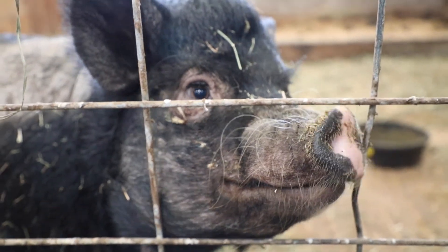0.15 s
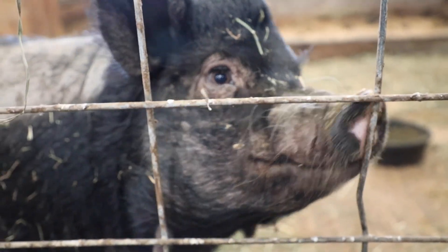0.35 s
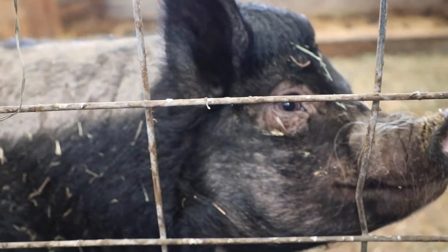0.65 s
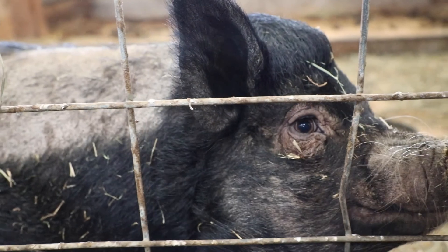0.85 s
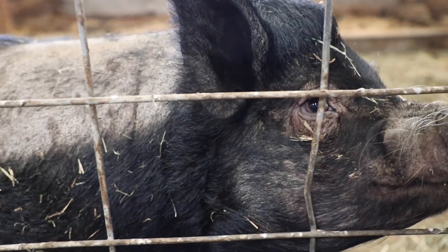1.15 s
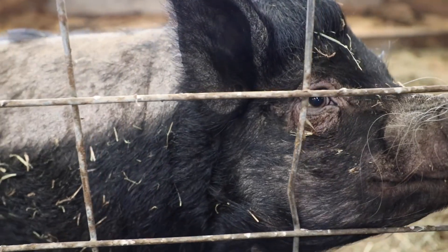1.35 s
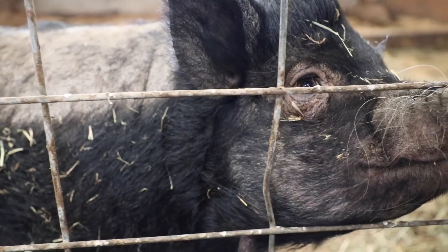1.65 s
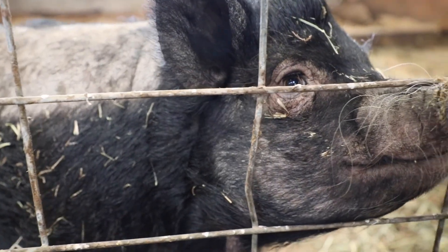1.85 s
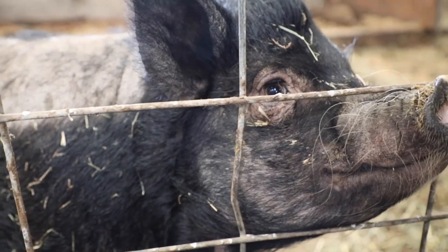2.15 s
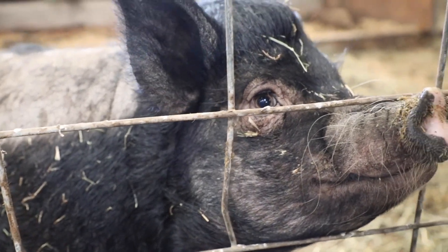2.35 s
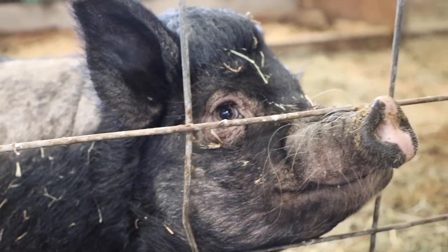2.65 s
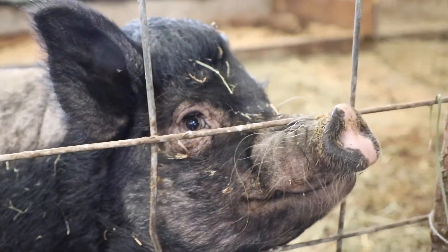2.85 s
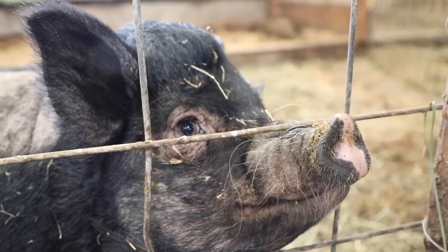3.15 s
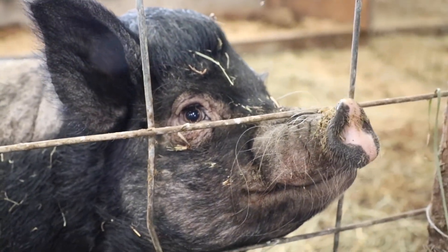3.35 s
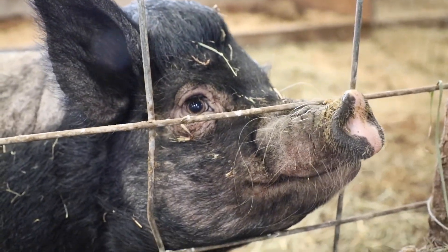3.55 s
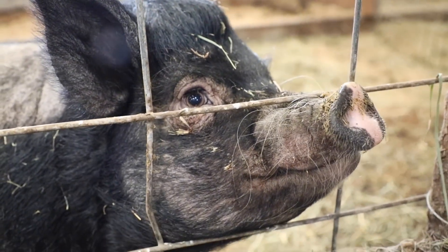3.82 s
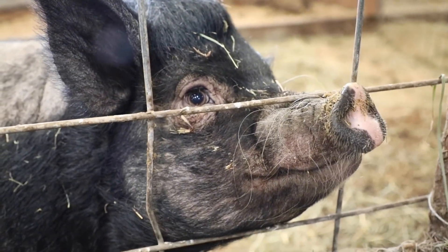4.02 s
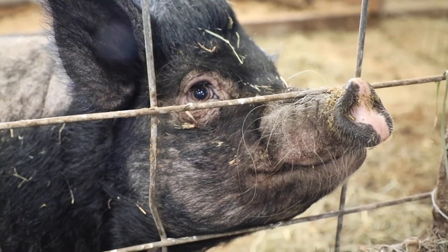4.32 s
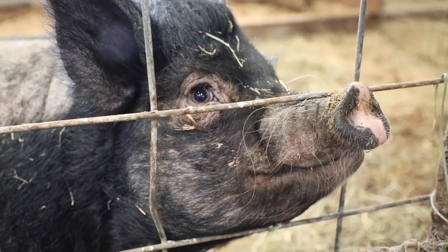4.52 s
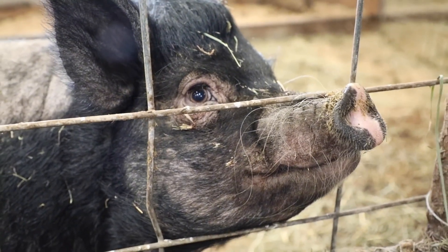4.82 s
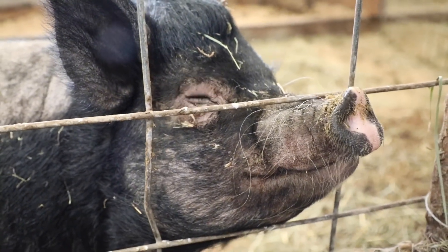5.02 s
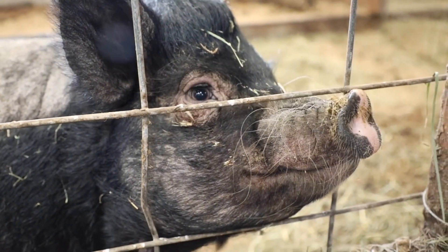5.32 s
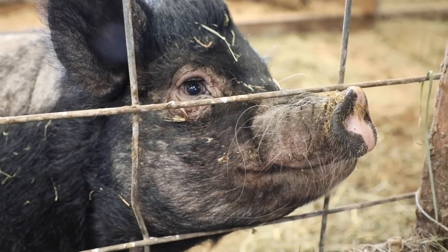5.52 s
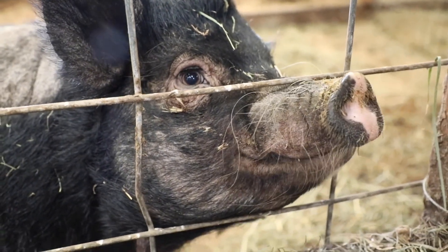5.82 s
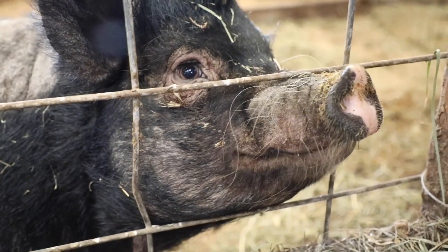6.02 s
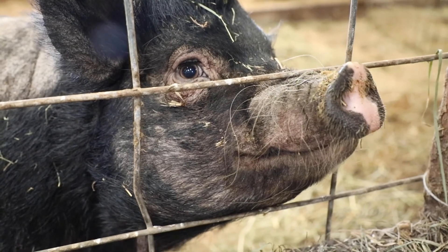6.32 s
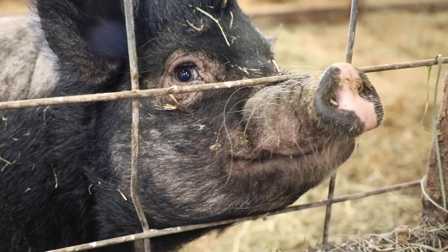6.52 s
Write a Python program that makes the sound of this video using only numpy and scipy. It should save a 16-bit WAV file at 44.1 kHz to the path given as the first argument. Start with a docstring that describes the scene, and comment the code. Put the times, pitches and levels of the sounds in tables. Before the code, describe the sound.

Close wet pig snorts, nasal breath and low air buffets, with hoarse distant crowing and one long rooster note echoing through a quiet barn.

```python
"""A pig snorts close to the microphone from the start: soft palate and nostrils flap, often about thirty times
a second, each flap a pulse into resonant cavities. Shaped noise hisses as breath, puffs and buffets on the
microphone, and wet ticks come early and late. Hoarse crowing, blurred partials and noise, sounds further off in
the barn before, under and after a rooster's long clear note of summed partials, from just after 3 s to past 5 s.
Throughout, the barn rings on through a decaying noise echo over its own quiet air."""
import sys
import numpy as np
from scipy import signal
from scipy.fft import rfft, irfft, next_fast_len
from scipy.io import wavfile
from scipy.ndimage import map_coordinates

SR = 44100
rng = np.random.default_rng(int(sys.argv[2]) if len(sys.argv) > 2 else 0)


def digitize_waveform(pressure):
    """Quantize a signal to 16-bit integers and store it at the path in sys.argv[1].

    Rows of a 2-D input are taken as channels; values are limited to [-1, 1].
    """
    field = np.atleast_2d(pressure).T
    bounded = np.clip(field, -1, 1)
    quanta = np.round(bounded * 32767).astype(np.int16)
    wavfile.write(sys.argv[1], SR, quanta)


N = 294147
TIME = np.arange(N) / SR


def amp(db):
    """Gain of a level in dB."""
    return 10 ** (np.asarray(db) / 20)


def unit(x):
    """Scaled to rms 1."""
    return x / np.sqrt(np.mean(np.abs(x) ** 2) + 1e-20)


def along(points, hz):
    """(f/Hz, value) points read on a log frequency axis."""
    f, v = np.transpose(points)
    return np.interp(np.log(hz + 1), np.log(f + 1), v)


def curves(rows):
    """One value per sample for each column after the time."""
    s, *cols = np.transpose(rows)
    return [np.interp(TIME, s, c) for c in cols]


def during(rows, fade=0.031):
    """1 while a table lasts, fading out over about 31 ms beyond its ends."""
    return np.clip(1 + np.minimum(TIME - rows[0][0], rows[-1][0] - TIME) / fade, 0, 1)


def wobble(rate):
    """A smooth random curve of rms 1, rate knots a second."""
    knots = rng.standard_normal(int(N * rate / SR) + 4)
    return unit(map_coordinates(knots, [TIME * rate]))


def filtered(x, response):
    """x passed through a complex response of frequency."""
    m = next_fast_len(N + SR)
    return irfft(rfft(x, m) * response(np.fft.rfftfreq(m, 1 / SR)), m)[:N]


def resonances(modes):
    """Causal response of (f/Hz, width/Hz, level/dB) modes, alternating in sign."""
    def response(f):
        total = 0
        for k, (centre, width, db) in enumerate(modes):
            loss = 1j * f * width
            total = total + (-1) ** k * amp(db) * loss / (centre * centre - f * f + loss)
        return total
    return response


def noise(spectrum):
    """Noise of rms 1 with a given spectrum."""
    return unit(filtered(rng.standard_normal(N), lambda hz: amp(along(spectrum, hz))))


def resonant_noise(modes, power=1):
    """Noise through resonances, applied power times over."""
    return filtered(rng.standard_normal(N), lambda hz: resonances(modes)(hz) ** power)


def swells(rows, rise):
    """Power of each (t/s, hold/s, level/dB, fade/(dB/s)) event: a quick rise, a hold, a steady fade."""
    s, hold, db, fade = np.transpose(rows)[:4, :, None]
    rising = rise * np.maximum(s - TIME, 0)
    fading = fade * np.maximum(TIME - s - hold, 0)
    return amp(db - rising - fading) ** 2


# colour of the barn's quiet air: f/Hz, relative level/dB per Hz
BARN_AIR_COLOUR = [(20, 7.5), (200, -11.5), (600, -1.5), (1500, -12.5), (5000, -39), (16000, -52)]


def barn_air():
    """Steady coloured noise fills the barn quietly."""
    return amp(-59) * noise(BARN_AIR_COLOUR)


# how long the barn rings: f/Hz, time to fall 60 dB t60/s
BARN_DECAY = [(200, 0.84), (1000, 0.84), (4000, 0.69), (12000, 0.5)]


def barn(x):
    """Each frequency of the barn's answer dies at its own speed."""
    hz, t, z = signal.stft(rng.standard_normal(SR), SR, nperseg=256)
    decay = amp(-60 * t / along(BARN_DECAY, hz)[:, None])
    tail = signal.istft(z * decay, SR, nperseg=256)[1]
    delayed = np.pad(x, (500, 0))  # samples
    return signal.fftconvolve(delayed, tail / np.linalg.norm(tail))[:N]


# bursts of rasp: full at t/s, hold/s, relative level/dB, fade/(dB/s)
RASP_BURSTS = [(0.83, 0.027, -41.5, 150), (1.36, 0.032, -38, 93), (2.25, 0.019, -32, 166),
               (2.33, 0.035, -47, 14), (2.93, 0.26, -30, 246), (3.3, 0.024, -39, 60),
               (3.4, 0.031, -36.5, 61), (3.72, 0.047, -38.5, 107), (4.61, 0.011, -48.5, 131),
               (5.15, 0.39, -28.5, 70), (5.7, 0.063, -40, 27)]
RASP_RISE = 400  # dB/s
# hoarse notes: start t/s, length/s, first f/Hz, last f/Hz, relative level/dB,
# even partials over odd level/dB, third partial boost level/dB
HOARSE_NOTES = [(2.3, 0.074, 543, 550, -42, -13.5, 5), (2.44, 0.072, 491, 492, -35.5, -10, -29),
                (2.922, 0.11, 636, 629.7, -24.5, -3, 7.5), (2.992, 0.23, 532.5, 522, -39.5, 17.5, 15.5),
                (3.158, 0.12, 606, 755, -26, -1.5, 10.5), (3.338, 0.21, 740, 666, -34.5, -9.5, 8.5),
                (3.642, 0.24, 751, 746.6, -29.5, 2.5, 6), (3.704, 0.14, 650.4, 667, -33.5, -4.5, 9.5),
                (3.709, 0.098, 525.6, 519, -40, 4.5, -8), (5.127, 0.33, 533.7, 524, -32, 1, 3.5),
                (5.112, 0.14, 717, 540, -32.5, -12, -18), (5.236, 0.26, 664, 511.2, -29.5, -16, -4),
                (5.16, 0.46, 737, 764.5, -35.5, 9, 3), (5.138, 0.78, 820, 804, -34, -11.5, 14),
                (5.385, 0.43, 806.6, 749, -32, -14, -21), (5.444, 0.37, 403, 398.3, -28, -7, -5)]
# colour of the gullet: f/Hz, gain level/dB
GULLET_COLOUR = [(180, -60), (300, -17), (420, -12.5), (630, 5), (860, -4), (1050, -3.5), (1500, -2.5),
                 (1800, -18.5), (2500, -15.5), (3400, -24), (4200, -40.5), (5400, -18), (6500, -44),
                 (8000, -32), (12000, -60), (16000, -90)]


def hoarse():
    """Gliding notes of blurred partials and an unevenly throbbing noise rasp, both through the gullet."""
    throb = amp(9.5 + 2.2 * wobble(45))
    out = np.sqrt(swells(RASP_BURSTS, RASP_RISE).sum(0)) * throb * rng.standard_normal(N)
    for s, length, first_hz, last_hz, db, even_db, third_db in HOARSE_NOTES:
        t = np.arange(round(length * SR)) / SR
        turns = first_hz * t + (last_hz - first_hz) * t * t / (2 * length)
        arch = np.sqrt(np.abs(np.sin(np.pi * t / length)))
        for k in range(1, 9):
            # higher partials blur faster
            knots = rng.standard_normal((2, 200))
            blur = [map_coordinates(row, [np.minimum(t * (70 + 22 * k), 199)]) for row in knots]
            blurred = 0.58 + 0.78 * (blur[0] + 1j * blur[1])
            tone = np.real(np.exp(2j * np.pi * k * turns) * blurred)
            lift_db = even_db * (k % 2 == 0) + third_db * (k == 3) - 1.19 * k
            out[round(s * SR):][:len(t)] += amp(db + lift_db + 3 - 23.5 * t) * arch * tone
    return filtered(out, lambda hz: amp(along(GULLET_COLOUR, hz)))


def partial(turns, rough, blur_hz):
    """A partial near rms 1; the rough share of it is a narrow band of noise on the same pitch."""
    share = np.clip(rough, 0, 1)
    blur = wobble(blur_hz) + 1j * wobble(blur_hz)
    return np.real(np.exp(2j * np.pi * turns) * (np.sqrt(2 - 2 * share) + np.sqrt(share) * blur))


# the long crow's two parts, either side of a break in the voice: t/s, pitch f/Hz,
# first partial level/dB, second level/dB, seventh level/dB, roughness 0-1
CROW_PARTS = [
    [(3.2, 795, -28.5, -40, -56, .2), (3.26, 822, -23.5, -26, -59, 0.22),
     (3.35, 811, -31, -29.5, -62, 0.56), (3.44, 815, -26.5, -29.5, -62, 0.56),
     (3.51, 829, -29, -27, -50, 0.54), (3.62, 795.7, -26, -28, -63, .42),
     (3.72, 796.6, -35, -44, -64.5, 0.52)],
    [(3.77, 794.4, -28.5, -30, -59.5, 0.27), (3.84, 794.4, -25.5, -27.5, -55.5, 0.29),
     (3.9, 763.5, -24.5, -29.5, -57, 0.02), (4, 763.7, -24, -27, -56, 0.01),
     (4.31, 758.7, -27, -28.5, -59, 0.04), (4.45, 752.3, -31, -35.5, -60, 0.08),
     (4.62, 738.2, -35.5, -21.5, -62, 0.09), (4.79, 734, -33.5, -35.5, -61.5, 0.12),
     (4.91, 729.3, -44.5, -30, -57, 0.14), (5.02, 724.4, -31, -30.5, -54.5, 0.22),
     (5.11, 708.7, -27.5, -29.5, -55, 0.32), (5.16, 702, -65, -30, -57, .5),
     (5.26, 701, -57, -45, -79, 0.5)],
]
# upper series: partial number, level/dB over the seventh curve in the first part, in the second
UPPER_PARTIALS = [(3, 4.5, 4.5), (4, 14, 0), (5, -9, -4.5), (6, -27, -6.5), (7, 5, 2.5), (8, -9.5, -4),
                  (9, -8.5, -12), (10, -14, -16)]
# highest series: partial number, level/dB over the seventh curve
THIN_PARTIALS = [(11, -12), (12, -14), (13, -26), (14, -22), (15, -23), (16, -26), (17, -32), (18, -38)]


def crow():
    """Two strong partials and a long thin series; roughness blurs them and unsteadies the pitch."""
    out = np.zeros(N)
    for part, rows in enumerate(CROW_PARTS):
        pitch, first_db, second_db, seventh_db, rough = curves(rows)
        first_db, second_db = [db + 4 * rough * wobble(12) for db in (first_db, second_db)]
        drift = 0.00057 * wobble(40) + 0.000955 * wobble(9) + 0.02 * rough * wobble(85)
        turns = np.cumsum(pitch * (1 + drift)) / SR
        note = amp(first_db) * partial(turns, rough, blur_hz=62.8)
        note += amp(second_db) * partial(2 * turns, rough, blur_hz=91.46)
        for k, *db in UPPER_PARTIALS:
            level_db = seventh_db + db[part] + 1.97 * wobble(7)
            note += amp(level_db) * partial(k * turns, rough + 0.1, blur_hz=108.7)
        for k, db in THIN_PARTIALS:
            level_db = seventh_db + db - 10 * rough + 3 * wobble(6.8)
            note += amp(level_db) * partial(k * turns, rough + 0.1, blur_hz=120)
        out += during(rows) * note
    return out


# jets of breath striking the microphone: t/s, relative level/dB
BREATH_JETS = [(0.31, -15.5), (1.089, -15), (1.458, -29.5), (2.1, -28), (2.774, -26)]


def puffs():
    """Each jet is a push and a slower swing back, its beat slowing as it dies."""
    jets, t = np.zeros(N + SR), np.arange(SR // 12) / SR
    onset = np.sin(np.pi / 2 * np.minimum(t / 0.0014, 1)) ** 2
    swing = np.cos(2 * np.pi * 7.3 * np.sqrt(t))
    for s, db in BREATH_JETS:
        jets[round(s * SR):][:len(t)] += amp(db + 11.5 - 60 * t / 0.028) * onset * swing
    return jets[:N]


# lumps of air on the microphone: full at t/s, hold/s, level/dB, fade/(dB/s)
AIR_LUMPS = [(0.31, 0.024, -28, 101), (0.76, 0.19, -37.5, 88), (1.095, 0.025, -25.5, 500),
             (1.38, 0.055, -32, 125), (1.84, 0.018, -39, 51), (1.95, 0.0091, -54, 112),
             (2.12, .02, -35, 19), (2.38, 0.019, -37, 59), (2.785, .005, -35, 300), (3.17, 0.017, -54, 157),
             (3.46, .02, -44, 64), (4.35, .01, -47, 164), (4.61, .01, -50, 179), (4.92, 0.076, -44, 348),
             (5.11, .01, -38, 120), (5.63, 0.0091, -43, 245), (6.04, 0.0086, -44, 150),
             (6.3, .01, -54, 165), (6.64, .05, -43, 100)]
# buffeting between lumps: t/s, level/dB
STILL_BUFFET = [(0, -44), (1.2, -43.5), (2.8, -40), (3.3, -63.5), (4.2, -66), (5.3, -51), (6, -48.5),
                (6.67, -48.5)]
# colour of the buffeting: f/Hz, relative level/dB per Hz
BUFFET_COLOUR = [(8.8, -54.5), (15, -19), (38, -1), (70, -3), (138, -9.5), (432, -19.5), (646, -28.5),
                 (700, -41), (910, -66), (1540, -120)]
GUST_RISE = 390  # dB/s


def buffeting():
    """Lumps of air tumble over the microphone as low, uneven noise."""
    gusts = np.sqrt(swells(AIR_LUMPS, GUST_RISE).sum(0) + amp(*curves(STILL_BUFFET)) ** 2)
    return gusts * unit(amp(3.7 * wobble(25)) * noise(BUFFET_COLOUR))


# out-breaths: full at t/s, hold/s, relative hiss level/dB, fade/(dB/s), nostril whistle over hiss level/dB
OUT_BREATHS = [(0.189, 0.012, -49, 150, -6), (0.293, 0.047, -36, 256, -0.5), (0.42, 0.15, -56, 101, -11),
               (0.58, .02, -52, 200, 3.5), (0.7, 0.047, -41, 127, 2.5), (0.833, 0.23, -46.5, 110, -3.5),
               (1.665, 0.6, -49.5, 56, -7), (1.94, 0.28, -51.5, 28, -5.5), (2.96, 0.012, -59, 122, 15),
               (3.647, .02, -60.5, 198, 1), (3.827, 0.016, -65.5, 204, -2), (4.344, 0.017, -60, 49.5, 7),
               (4.987, 0.11, -60.5, 62, 9.5), (5.166, 0.022, -61.5, 46, 9.5), (5.53, 0.024, -60.5, 150, -3),
               (5.66, .04, -50, 224, 5), (6.219, .03, -52, 128, 7.5), (6.38, 0.017, -51, 104, 4.5),
               (6.438, 0.036, -45, 150, -21), (6.555, 0.016, -49.5, 167, -16)]
# hiss between breaths: t/s, relative level/dB
CALM_HISS = [(0, -68), (1.3, -54.5), (2.8, -60.5), (3.1, -72.5), (3.4, -78), (4.1, -80), (4.9, -73.5),
             (5.8, -64), (6.67, -57.5)]
# colour of the hiss: f/Hz, relative level/dB per Hz
HISS_COLOUR = [(240, -34.5), (400, -5), (1040, -8.5), (1250, -8), (2470, -7.5), (3020, -10), (3930, -18),
               (6240, -8), (11400, -10.5), (16000, -17)]
# resonances of air in the nostrils: f/Hz, width/Hz, relative level/dB
NOSTRIL_WHISTLE = [(2570, 2050, 3), (3940, 910, 10), (5410, 2250, 5.5)]
BREATH_RISE = 460  # dB/s


def breath():
    """Air hisses and whistles from the nostrils, puffing and buffeting on the microphone."""
    each, calm = swells(OUT_BREATHS, BREATH_RISE), amp(curves(CALM_HISS)[0]) ** 2
    hiss_db = 10 * np.log10(each.sum(0) + calm)
    whistle_share = amp(np.transpose(OUT_BREATHS)[-1]) ** 2
    whistle_db = 10 * np.log10(whistle_share @ each + calm) - hiss_db
    hiss = amp(hiss_db + 2 + 2.06 * wobble(30)) * noise(HISS_COLOUR)
    # weak flow is trimmed above about 10.5 kHz, so its top sinks faster than its body
    top = filtered(hiss, lambda hz: 1 / (1 + (10500 / (hz + 1)) ** 8))
    hiss += top * (amp(np.minimum(0.21 * (hiss_db + 48.5), 0)) - 1)
    whistle = unit(resonant_noise(NOSTRIL_WHISTLE, power=2))
    hiss += amp(hiss_db + whistle_db + 2.5 * wobble(40)) * whistle
    return hiss + puffs() + buffeting()


# wet ticks of spittle at the lips: t/s, relative level/dB, centre f/Hz
SPITTLE_TICKS = [(0.4947, -29, 2820), (1.483, -33, 1300), (1.5015, -28, 2590), (1.517, -41, 1300),
                 (1.645, -36, 2800), (5.796, -44, 7500), (5.951, -30.5, 1620), (5.9664, -28, 2230),
                 (5.9794, -41, 1400), (6.0294, -42, 1363), (6.0665, -27.5, 3300), (6.0724, -35, 1660),
                 (6.098, -50, 1580), (6.115, -24, 2040)]


def ticks():
    """A bursting film of spittle: a fast-dying ring and a click of noise."""
    out, t = np.zeros(N + SR), np.arange(SR // 100) / SR
    clicks = rng.standard_normal((len(SPITTLE_TICKS), len(t)))
    for (s, db, hz), air in zip(SPITTLE_TICKS, clicks):
        ring = amp(-60 * t / 0.0047) * np.sin(2 * np.pi * hz * t)
        click = 0.15 * amp(-60 * t / 0.002) * air
        out[round((s + 0.001) * SR):][:len(t)] += amp(db + 3) * (ring + click)
    return out[:N]


# snorts, each a short run of flaps: first flap t/s, second flap t/s, last flap t/s, number of flaps
SNORT_RUNS = [(0.1775, 0.1965, 0.2567, 4), (0.5862, 0.596, 0.638, 4), (0.822, 0.848, 0.8797, 3),
              (1.035, 1.047, 1.047, 2), (1.1088, 1.1306, 1.163, 3), (1.7499, 1.7499, 1.7499, 1),
              (1.781, 1.791, 1.8, 3), (1.8245, 1.8581, 1.8904, 3), (2.3574, 2.39, 2.4207, 3),
              (2.778, 2.778, 2.778, 1), (2.8269, 2.8269, 2.8269, 1), (2.8507, 2.8829, 2.9161, 3),
              (3.5423, 3.5715, 3.608, 3), (4.2727, 4.3075, 4.3354, 3), (4.8572, 4.8572, 4.8572, 1),
              (4.9122, 4.9395, 4.9687, 3), (5.1513, 5.1805, 5.2094, 3), (5.5543, 5.5884, 5.624, 3),
              (6.204, 6.2235, 6.2235, 2), (6.2377, 6.2697, 6.331, 4)]
# their strength, row for row, all relative: crack of the first, middle and last flap level/dB,
# throat thump level/dB, nasal ring level/dB
SNORT_FORCE = [(-30, -20.5, -15.5, -20.5, -20), (-31.5, -26.5, -14.5, -21.5, -16),
               (-49, -19, -21, -22.5, -32.5), (-24.5, -22, -20.5, -32, -32),
               (-16.5, -5.5, -25.5, -19.5, -19.5), (-39, -43, -43, -34, -57), (-27, -20.5, -30, -25, -21.5),
               (-12, -14, -20, -24, -21.5), (-43, -31, -27, -27, -43), (-33.5, -32, -32, -39, -49),
               (-30, -30, -30, -31, -34.5), (-8, -7, -22, -23, -21), (-20.5, -26, -30, -33, -24.5),
               (-50, -38.5, -40.5, -35.5, -43), (-54, -48, -48, -41.5, -57), (-19, -19.5, -31, -29.5, -29),
               (-27.5, -22, -39.5, -27.5, -30.5), (-8, -8.5, -25, -26, -29), (-52, -36, -30, -38, -51),
               (-10, -9, -13.5, -21.5, -17.5)]
THUMP_FOLLOWS, RING_FOLLOWS = 0.35, 1  # dB lost per dB that a crack is weaker than the loudest
SCATTER_DB = 1  # chance spread of thump and ring


def flaps():
    """Every flap of every snort: gaps change evenly, cracks arch from first over middle to last."""
    rows = []
    scatter = SCATTER_DB * rng.standard_normal((len(SNORT_RUNS), 4, 2))
    for (s, second, end, count), force, luck in zip(SNORT_RUNS, SNORT_FORCE, scatter):
        first, middle, last, thump_db, nasal_db = force
        first_gap = second - s
        last_gap = 2 * (end - s) / max(count - 1, 1) - first_gap
        times = s + np.r_[0, np.cumsum(np.linspace(first_gap, last_gap, count - 1))]
        u = np.linspace(-1, 1, count)
        crack_db = middle + u * (last - first) / 2 + u * u * ((first + last) / 2 - middle)
        weak = crack_db - crack_db.max()
        for k in range(count):
            low, ring = luck[k]
            flap_thump_db = thump_db + THUMP_FOLLOWS * weak[k] + low
            flap_ring_db = nasal_db + RING_FOLLOWS * weak[k] + ring
            rows.append((times[k], crack_db[k], flap_thump_db, flap_ring_db))
    return rows


# throat, nasal cavity and nostrils: f/Hz, width/Hz, relative level/dB
THROAT_MODES = [(239, 176, 5.5), (417, 450, -1)]
NASAL_MODES = [(740, 69, 6), (1298, 78, 1.5)]
NOSTRIL_MODES = [(2453, 320, 5), (3094, 287, 7.5), (3890, 296, 3), (5630, 440, -6.5), (6190, 550, -6.5),
                 (10200, 4000, -30)]
SQUEAK_TOP_DB = -17  # crack level above which flaps squeak no louder


def snout():
    """Each flap draws air for a moment, slaps shut with one sharp pulse, then sputters and squeaks as it parts."""
    thump, nasal, crack, direct, effort = np.zeros((5, N + SR))
    t = np.arange(SR // 40) / SR
    n = len(t)
    draw = -amp(-60 * t[::-1] / 0.0039)
    # the last of the suction is heard directly
    dip = -amp(-60 * t[::-1] / 0.007) * (1 - amp(-60 * t[::-1] / 0.002))
    slaps = flaps()
    chance = rng.standard_normal((len(slaps), n + 2))
    for (s, crack_db, thump_db, nasal_db), row in zip(slaps, chance):
        sputter = 0.09 * row[2:] * amp(-60 * t / 0.018)
        sputter[0] = -1  # the slap itself
        at = round((s + 0.00064) * SR)  # the slap follows the first rush of air
        before, after = slice(at - n, at), slice(at, at + n)
        crack[after] += amp(crack_db + 18.5) * sputter
        nasal[after] += amp(nasal_db + 35) * sputter
        thump[before] += amp(thump_db + 13.5) * draw
        thump[after] += amp(thump_db + 29.5) * sputter
        # the wet gap opens: a short rising squeak
        glide = (3900 + 300 * row[0]) * t * (1 + 16 * t)
        squeak_db = min(crack_db, SQUEAK_TOP_DB) - 8 + 3 * row[1] - 60 * t / 0.016
        direct[after] += amp(squeak_db) * np.minimum(t / 0.0015, 1) * np.sin(2 * np.pi * glide)
        direct[before] += amp(thump_db + 8) * dip
        effort[at] = amp(thump_db)
    low = filtered(thump, resonances(THROAT_MODES))
    ring = filtered(nasal, resonances(NASAL_MODES))
    sharp = filtered(crack, resonances(NOSTRIL_MODES))
    # the small nostril cavities pass little low sound
    sharp = filtered(sharp, lambda hz: (1j * hz / (1500 + 1j * hz)) ** 2)
    direct = filtered(direct, lambda hz: 1j * hz / (90 + 1j * hz))
    # around the flaps air keeps rumbling in the throat and fizzing in the wet nostrils
    flow = signal.fftconvolve(effort[:N], np.hanning(SR // 18))[SR // 60:][:N]
    rumble = unit(resonant_noise([(229, 130, -3), (780, 245, -11.5), (1285, 100, -21)]))
    fizz = resonant_noise([(2700, 600, -5), (5600, 900, 0)], power=2)
    fizz = unit(fizz * amp(9 * wobble(130)))
    return low + ring + sharp + direct + flow * (amp(-12) * rumble + amp(-24) * fizz)


def scene():
    """Pig close and nearly dry, rooster and hoarse crowing wetter, over the barn's quiet air."""
    pig, clear, rough = snout() + ticks(), crow(), hoarse()
    echo = barn(amp(-24) * pig + amp(-7.5) * clear + amp(-8) * rough)
    return (barn_air() + echo + rough + clear + breath() + pig)[None]


def record(dry):
    """The sharpest peaks flatten towards a ceiling; nothing is kept above the band limit."""
    ceiling, top_hz = 0.4, 15900
    held = dry[0] / (1 + np.abs(dry[0] / ceiling) ** 6) ** (1 / 6)
    return filtered(held, lambda hz: hz < top_hz)[None]


dry = scene()
out = record(dry)
digitize_waveform(out)
```